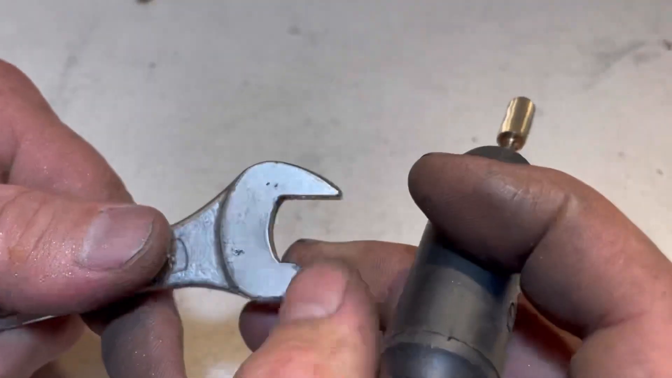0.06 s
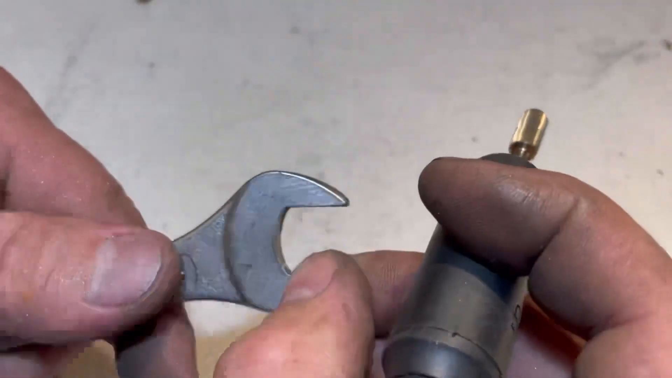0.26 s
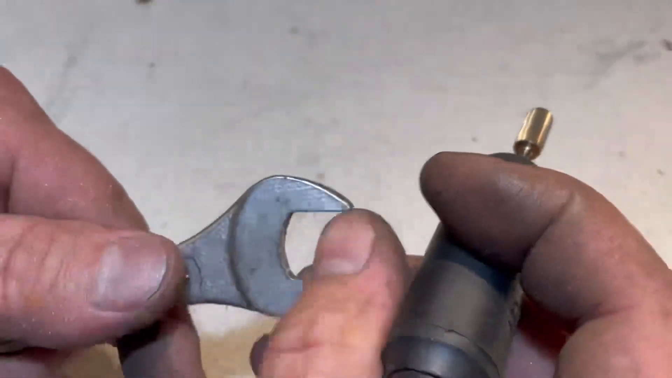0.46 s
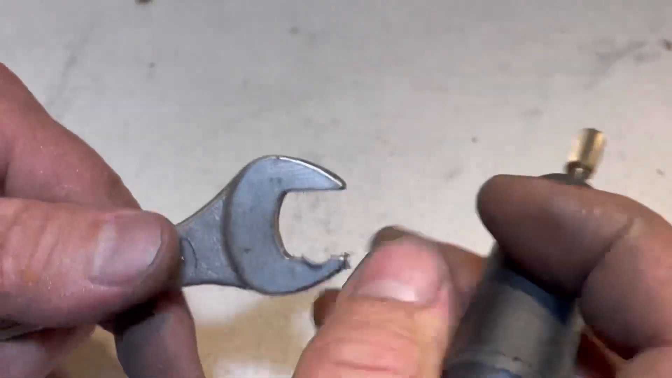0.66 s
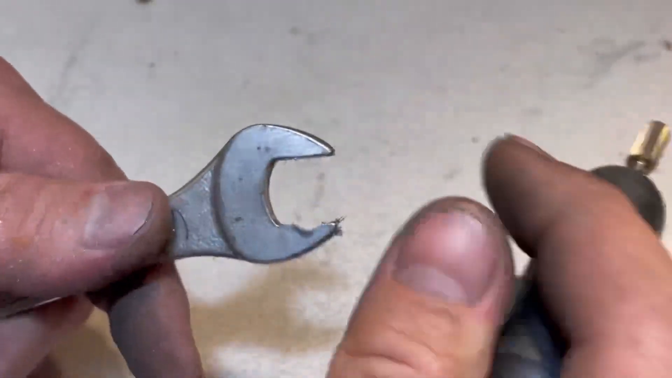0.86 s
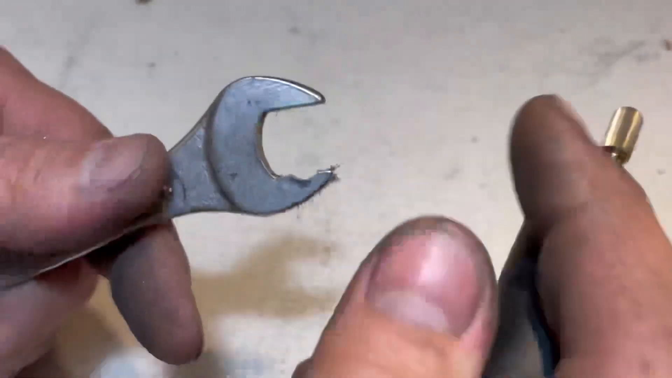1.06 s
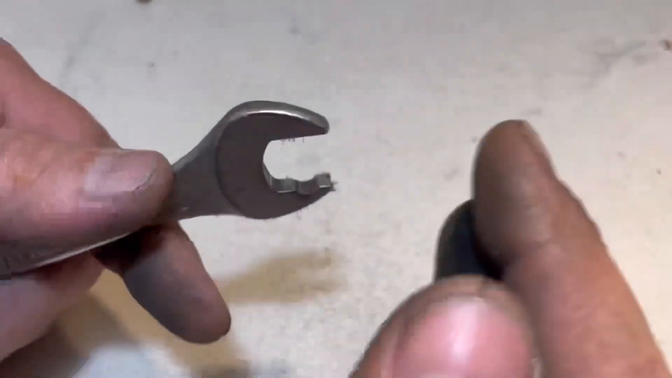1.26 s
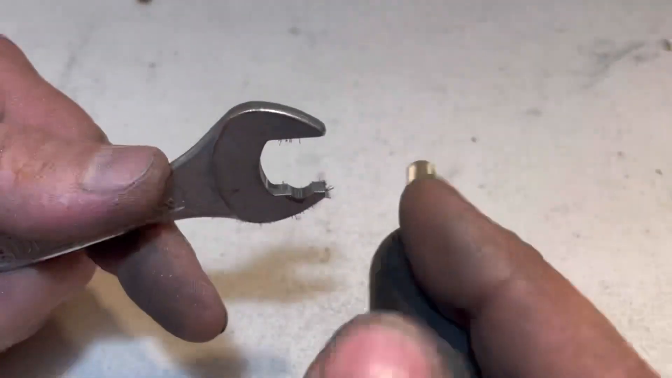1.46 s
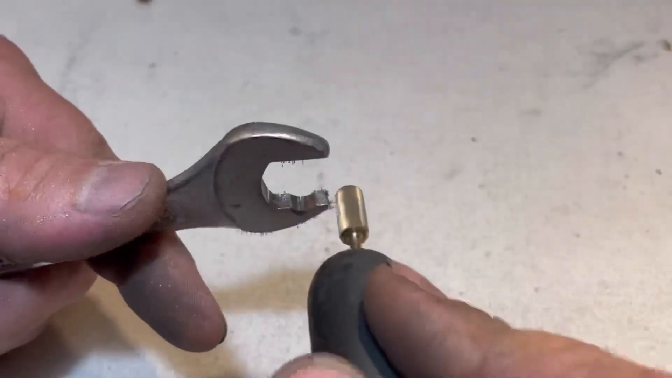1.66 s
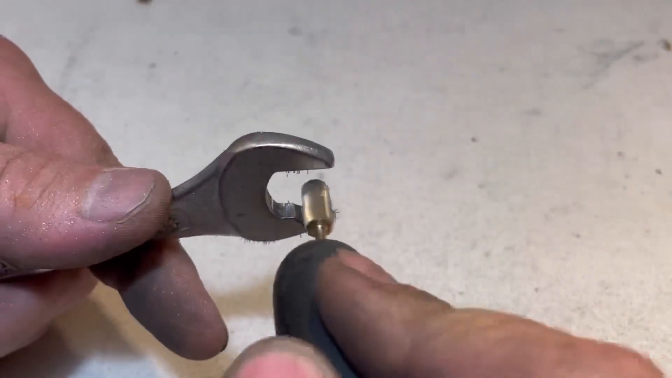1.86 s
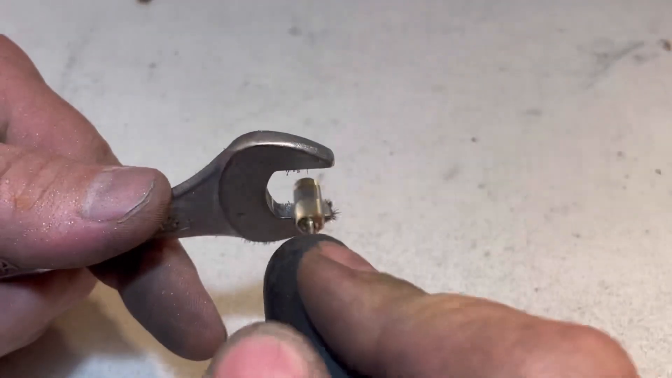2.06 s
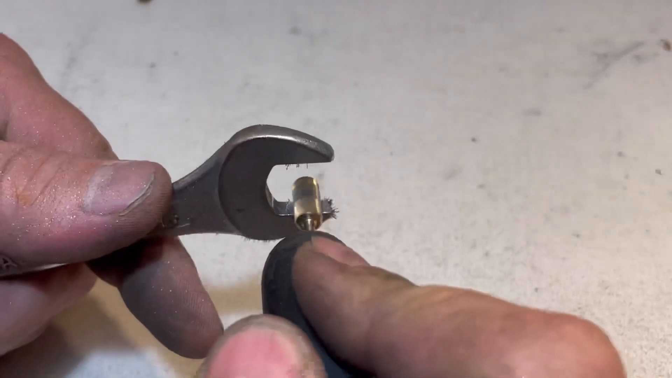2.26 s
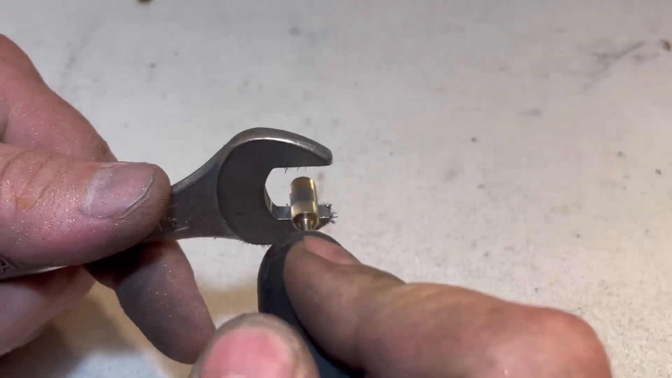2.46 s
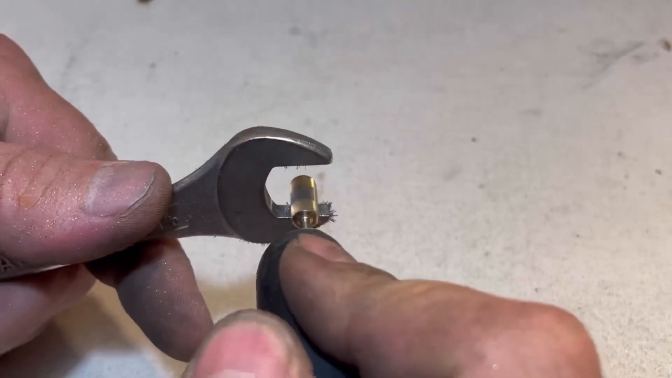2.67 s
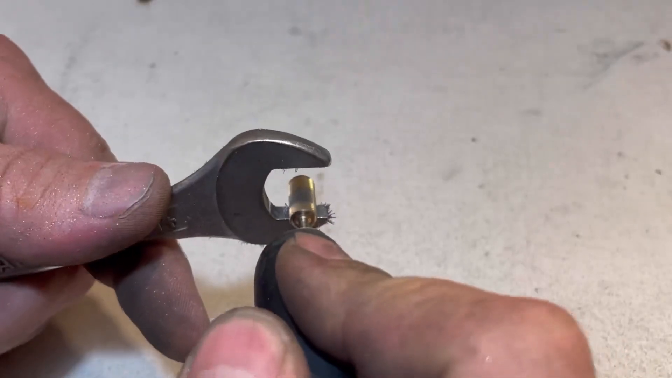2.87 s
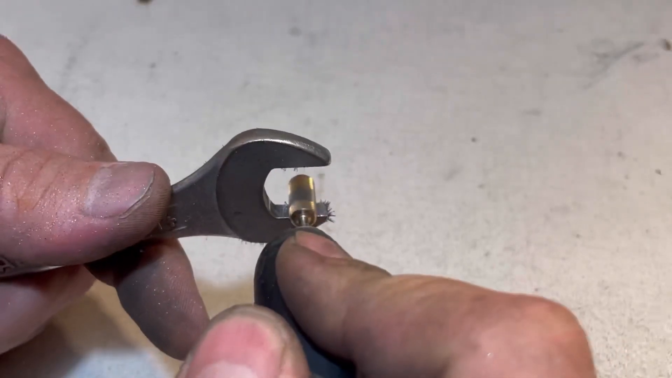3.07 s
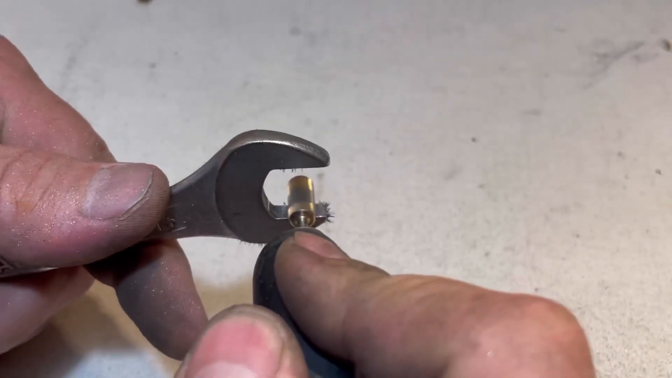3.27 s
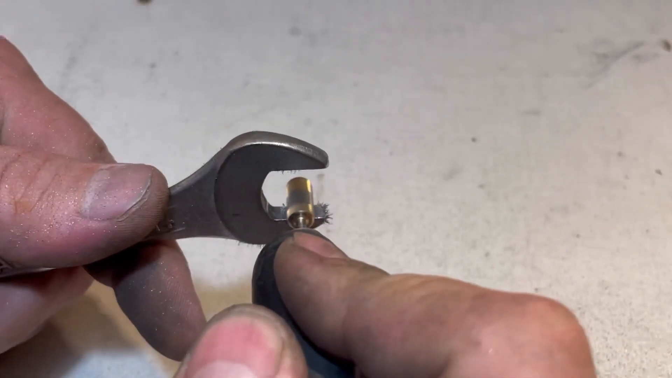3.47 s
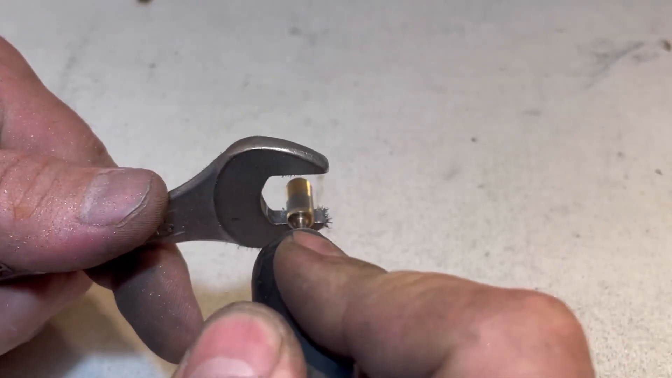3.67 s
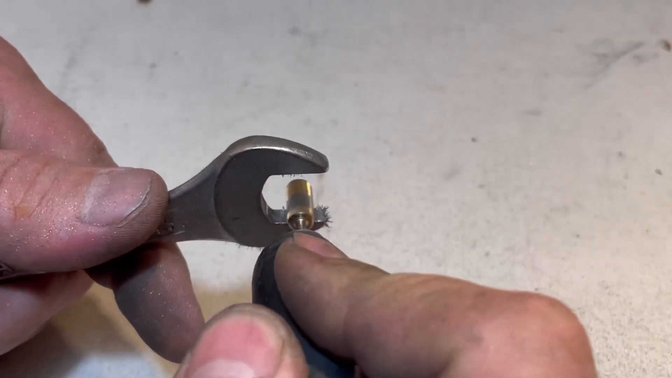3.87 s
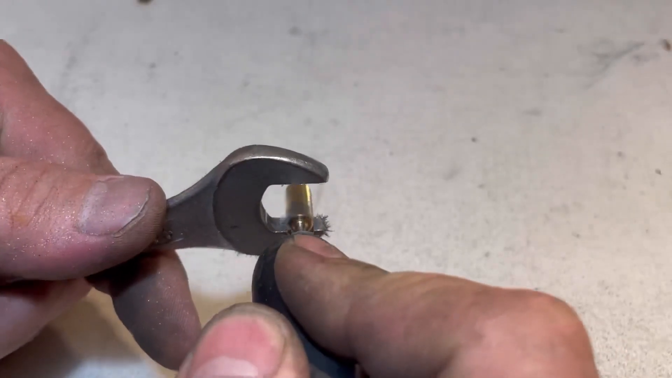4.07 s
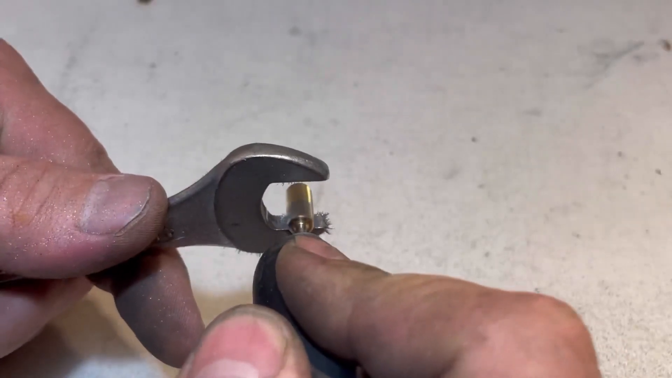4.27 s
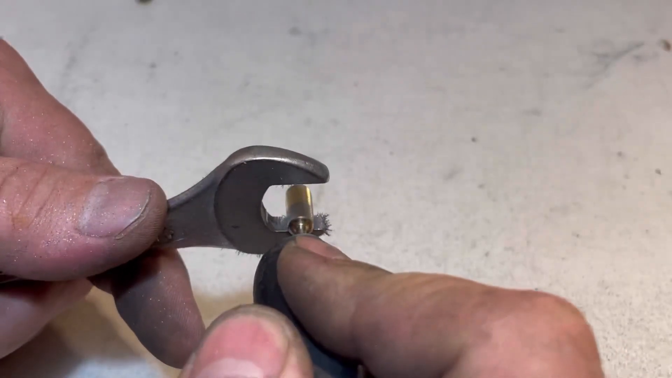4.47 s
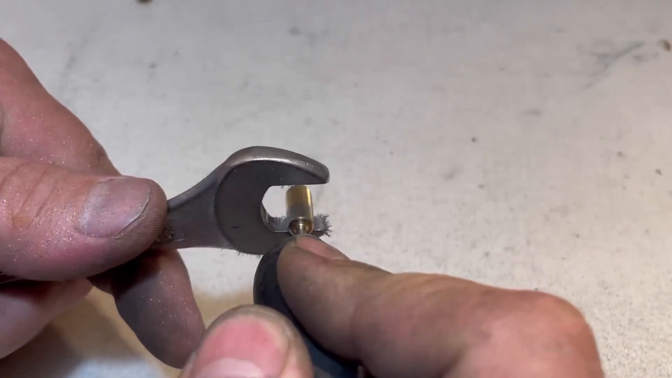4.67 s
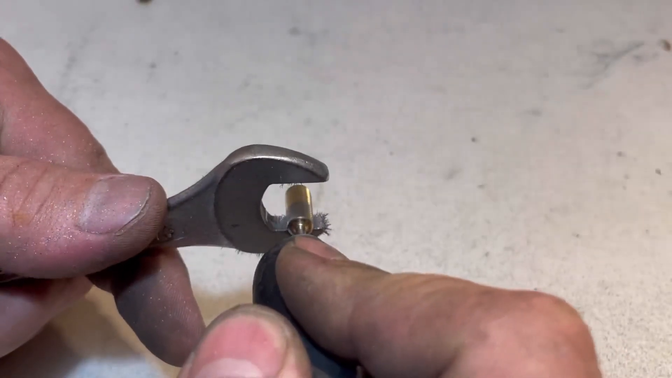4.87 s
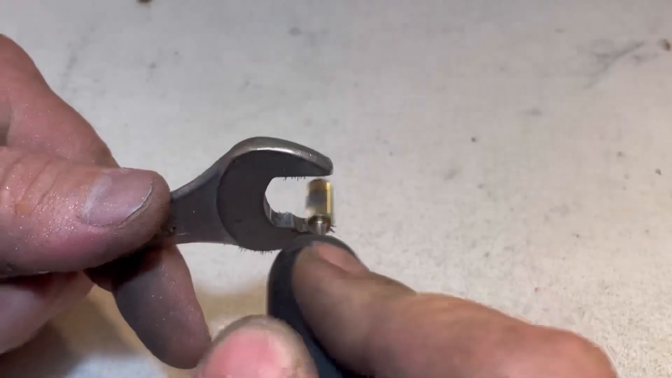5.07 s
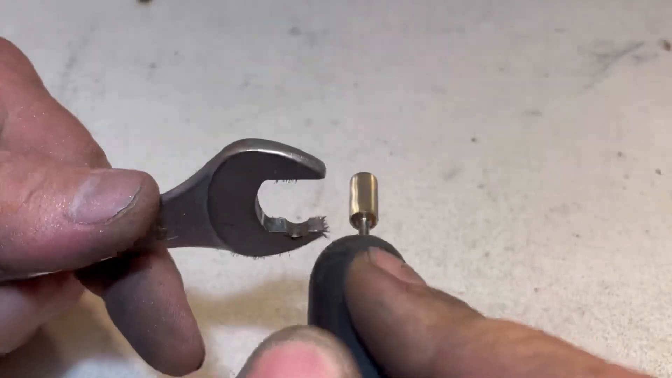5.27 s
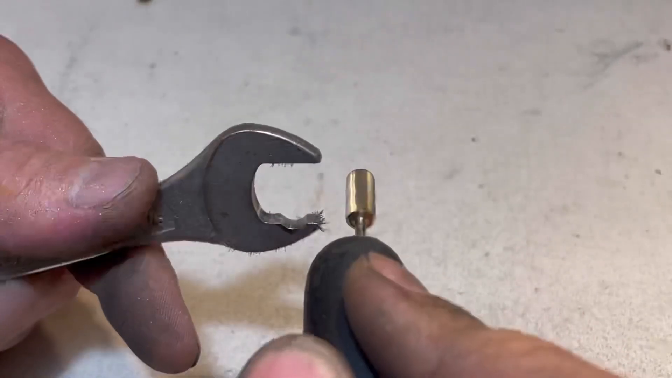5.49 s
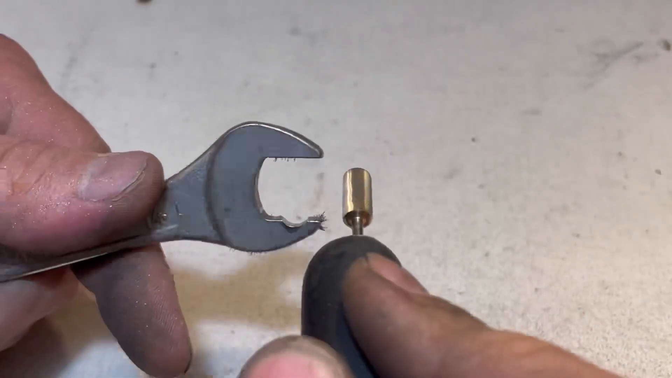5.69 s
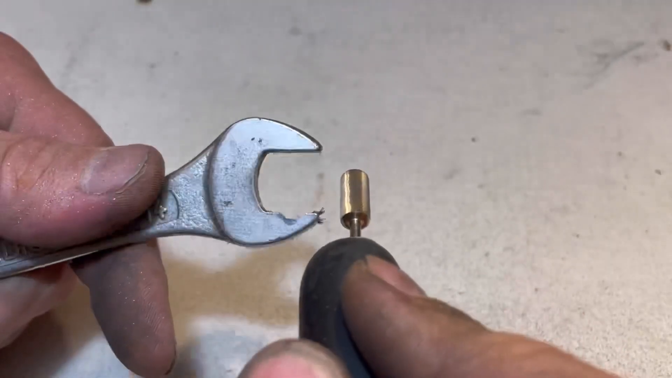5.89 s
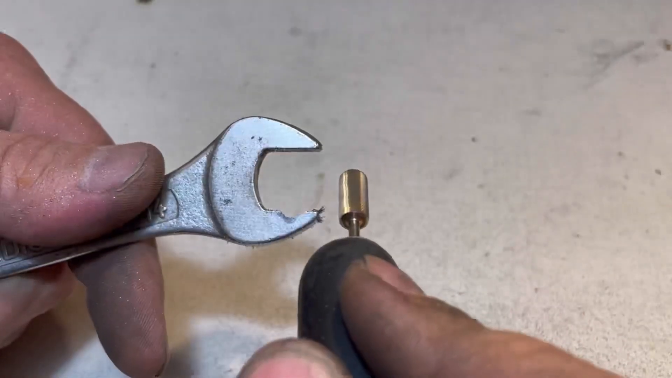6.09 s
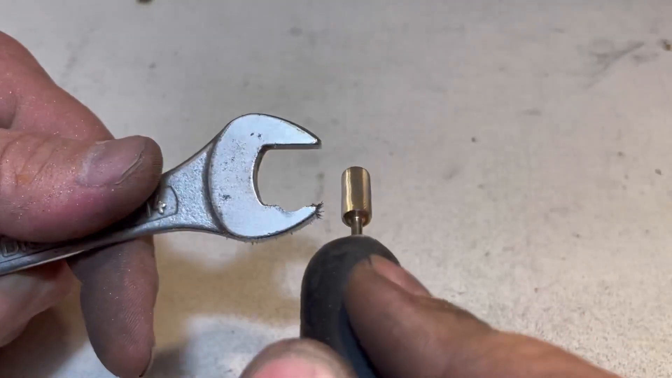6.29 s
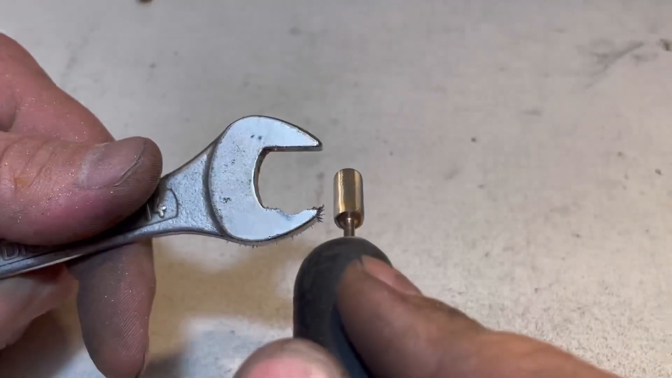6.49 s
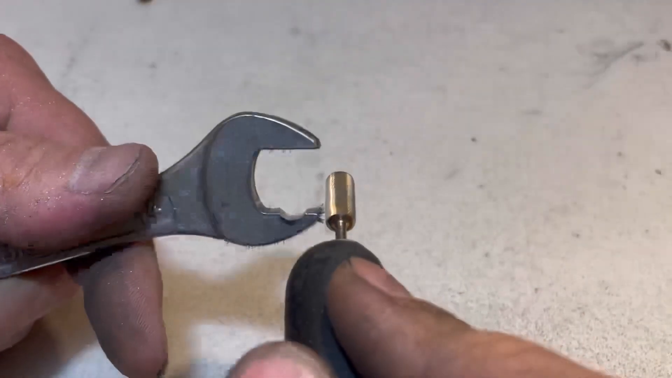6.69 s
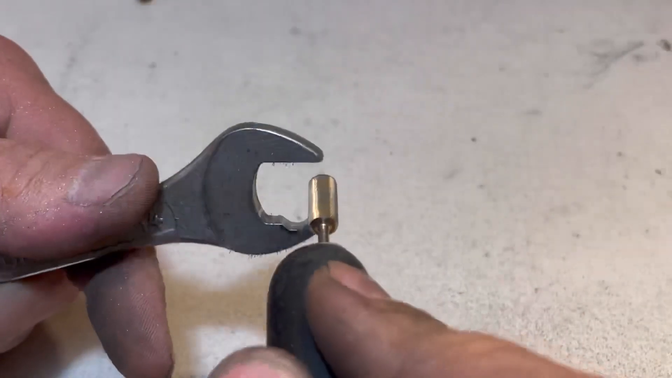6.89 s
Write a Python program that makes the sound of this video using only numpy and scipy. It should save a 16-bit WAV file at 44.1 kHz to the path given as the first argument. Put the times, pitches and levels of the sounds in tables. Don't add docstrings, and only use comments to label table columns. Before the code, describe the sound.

High motor whir runs free, bites into steel with a harsh, ringing scrape while the pitch sags, then climbs back to a clean whine.

```python
import sys
import numpy as np
from scipy import signal
from scipy.fft import rfft, irfft, next_fast_len
from scipy.io import wavfile

SR = 44100
rng = np.random.default_rng(int(sys.argv[2]) if len(sys.argv) > 2 else 0)


def dump(signal):
    limited = np.clip(np.atleast_2d(signal).T, -1, 1)
    pcm = np.round(limited * 32767).astype(np.int16)
    wavfile.write(sys.argv[1], SR, pcm)


def volts_from_decibels(level):
    exponent = np.asarray(level, float) / 20
    return 10 ** exponent


N = 306054
STEP = 64
CONTROL_S = np.arange(0, N, STEP) / SR
FREE_HZ = 371

# [t/s, level/dB]
PRESSURE = [
    (2.1, -21),
    (2.24, -10),
    (2.5, -4.5),
    (2.85, -0.5),
    (3.3, 0),
    (3.6, -3),
    (4.9, 0.5),
    (5.02, -7.5),
    (5.1, -33),
]
# [t/s, length/s, ring level/dB, shank level/dB]
BIT_ROCKS = [(2.14, 0.064, 15.5, 14), (2.49, 0.12, -2, 2.5), (2.58, 0.065, 1, -2), (3.0, 0.15, -5.5, 2),
             (3.57, 0.044, 1.5, -2.5), (3.67, .06, 2.5, -4), (3.8, 0.15, 5.5, 4.5),
             (3.86, 0.051, -3.5, -9.5), (3.94, .07, 3.5, -0.5), (4.01, 0.057, -3, -1.5),
             (4.08, 0.099, -5, 10), (4.14, 0.048, -9, -1.5), (4.2, .04, 1.5, -1), (4.36, 0.025, -1, -3),
             (4.68, .09, 0.5, 2.5), (4.74, 0.038, -10, -3.5), (4.85, 0.089, 1, -6), (4.91, 0.031, -7, -6),
             (4.965, 0.071, -11, 16), (5.06, 0.028, 12, -1)]


def shaft():
    # [t/s, f/Hz]
    allowed_speed = [(0, 374.4), (1.2, 374.6), (1.5, 369.2), (2.2, 363.4), (2.4, 333.5), (2.65, 302.5),
                     (2.9, 270.8), (3.2, 252.5), (3.5, 243.8), (3.9, 231), (4.4, 223.1), (4.96, 211.7),
                     (4.99, 363.8), (6.94, 366)]
    allowed, = curves(allowed_speed)
    lag_s = 0.45
    keep = np.exp(-1 / (lag_s * SR))
    return allowed[0] + signal.lfilter([1 - keep], [1, -keep], allowed - allowed[0])


def motor(hz, turns):
    # [f/Hz, level/dB per Hz]
    whir_colour = [(300, -40.5), (600, -19), (1100, -6), (1800, -9), (2600, 1), (3200, -3), (4000, -3.5),
                   (7000, -3.5), (9500, 0), (11800, 1.5), (12700, 2), (13400, -10), (15000, -6.5),
                   (15800, -14)]
    hum_db, orders_db, chatter_db, whir_db = motor_levels(hz)
    hum = volts_from_decibels(hum_db + 3.5 + 0.072 * wander(rate_hz=55)) * np.sin(2 * np.pi * turns)

    brushes = puffs(turns, steady=0.49, decay=0.31, uneven_db=-1)
    once_rung = ringing(brushes, [(2590, 650, 0)])
    chatter = evened(ringing(once_rung, [(2590, 660, 0)]))

    whir = coloured(puffs(turns, steady=0.55, decay=0.18, uneven_db=2), whir_colour)
    whir = volts_from_decibels(whir_db + 4.5 + wander(rate_hz=30)) * whir
    return hum + shaft_orders(hz, turns, orders_db) + volts_from_decibels(chatter_db - 4) * chatter + whir


def motor_levels(hz):
    # [t/s, hum level/dB, shaft orders level/dB, brush chatter level/dB, fan whir level/dB]
    grips = [(0, -44.5, -54.5, -59, -40), (.46, -48, -50.5, -46, -36.5), (1.36, -35.5, -51, -40.5, -33),
             (2.22, -33, -51.5, -40, -35.5), (2.62, -33.5, -43, -41, -32), (3.15, -35, -51, -40, -45),
             (3.9, -33.5, -52, -42, -47), (5.04, -34, -56, -42, -40.5), (5.2, -38.5, -57.5, -39, -41),
             (5.55, -36, -53, -38.5, -38), (6.7, -37.5, -52, -38.5, -37)]
    # [t/s, length/s, level/dB]
    swings = [(.33, .2, 1), (.6, .12, 1), (.71, .08, -1.5), (.84, 0.15, 2.5), (.95, 0.044, -1),
              (1.1, 0.26, 2), (1.55, .12, 1.5), (1.67, 0.088, 1), (2.48, 0.08, 1.5), (3.28, 0.047, -2.5),
              (3.41, 0.2, 4), (3.79, 0.054, 2.5), (5.6, 0.12, 1)]
    starts, *levels = np.transpose(grips)
    grip = smooth(sum(held(s, N, fade_s=0.1) for s in starts[1:]))
    hum_db, orders_db, chatter_db, whir_db = [np.interp(grip, np.arange(len(starts)), c) for c in levels]
    swing_db = bumps(swings)[0]
    octaves = np.log2(hz / FREE_HZ)
    hum_db = hum_db + swing_db + 28 * octaves
    whir_db = whir_db + 0.76 * swing_db + 7.5 * octaves
    return hum_db, orders_db + 0.62 * swing_db, chatter_db + swing_db, whir_db


def shaft_orders(hz, turns, orders_db):
    # [f/Hz, level/dB]
    housing = [(400, -7.5), (950, -2.5), (1250, 2.5), (1550, -1), (2100, 1.5), (2650, 2.5), (3300, 3.5),
               (12000, 5.5)]
    # [f/Hz, level/dB]
    loaded_jaw = [(520, -6), (850, 2.5), (1200, 1.5), (2150, -8.5), (2750, 8), (3600, 4), (5000, -2.5),
                  (6500, -7)]
    # [start t/s, end t/s, level/dB]
    sings = [(0.59, 0.647, 10.5), (0.57, 0.9, 7), (0.94, 1.14, 8.5), (0.78, 2.3, 10), (1.05, 2.13, 8.5),
             (1.51, 2.2, 11), (1.41, 1.72, 8.5), (1.34, 1.88, 14.5), (1.56, 2.4, 11), (1.4, 2.64, 10.5),
             (.5, .85, 8), (2.75, 3.2, 5.5), (2.3, 3.3, 5), (3.3, 3.9, 6.5), (3.85, 4.4, 10),
             (0.47, 0.63, 8), (5.35, 5.9, 8), (5.45, 5.85, 10.5), (5.15, 5.75, 10.5), (5.85, 7, 10.5),
             (4.9, 6.15, 3), (6.4, 8.2, 13.5), (5.18, 6.1, 10), (6.75, 8.3, 16), (0.34, 1.7, 3.5),
             (5.9, 6.5, 3.5), (1.27, 1.85, 7), (5.5, 6.3, 5.5), (2.45, 2.95, 8.5), (5.15, 6.1, 6)]
    sing_orders = [9, 4, 5, 3, 2, 6, 8, 17, 14, 32, 32, 4, 3, 5, 2, 6, 4, 8, 9, 7, 32, 32, 16, 16, 7, 6, 5,
                   3, 2, 5]
    slow_hz = hz[::STEP]
    loaded = held(2.76, N, fade_s=0.2) * held(-1, 5.0, fade_s=0.046)
    dig_db = 0.55 * bumps(BIT_ROCKS)[1, ::STEP]
    out = np.zeros(N)
    for k in [*range(2, 19), 20, 24, 28, 32]:
        level_db = orders_db[::STEP] + read(housing, k * slow_hz)
        level_db = level_db + loaded * (read(loaded_jaw, k * slow_hz) + (k > 8) * dig_db)
        if k > 10:
            level_db = level_db - 4 * (1 - loaded)
        for order, (start, end, db) in zip(sing_orders, sings):
            if order == k:
                level_db = level_db + db * held(start, end, fade_s=0.061)
        waver_db = 1.94 * slow_wander(rate_hz=16)
        slip = rng.random() + 0.012 * k * slow_wander(rate_hz=60)
        out += smooth(volts_from_decibels(level_db + waver_db)) * np.sin(2 * np.pi * (k * turns + smooth(slip)))
    return out


def grinding(hz, turns):
    # [f/Hz, level/dB per Hz]
    scrape_colour = [(250, -26), (600, -28), (1000, -14), (2100, -19), (2700, -10), (3500, -3.5),
                     (5500, -8.5), (8000, -9), (9500, 7), (11000, -1), (12500, -4.5), (13500, -15),
                     (15000, -11), (16000, -19.5)]
    # [f/Hz, width/Hz, level/dB]
    body_modes = [(7020, 330, 1.5), (8060, 143, -22), (15193, 500, -31)]
    # [f/Hz, width/Hz, level/dB]
    jaw_modes = [(10300, 104, 8.5), (9620, 670, -5.5)]
    scrape_db, ring_db, shank_db, shank_hz, bend_db = cut_levels(hz)
    t = np.arange(N) / SR
    landing = np.clip((t - PRESSURE[0][0]) / 0.1, 0, 1)
    lifting = np.clip((PRESSURE[-1][0] - t) / 0.03, 0, 1)
    touching = landing * lifting

    def bites():
        uneven = volts_from_decibels(0.93 * wander(rate_hz=70))
        return touching * uneven * puffs(turns, steady=0.86, decay=0.23, uneven_db=1)

    edge, shank_bites, jaw_bites = bites(), bites(), bites()
    scrape = coloured(edge + volts_from_decibels(10.5) * ringing(edge, body_modes), scrape_colour)
    scrape = volts_from_decibels(scrape_db + 8) * scrape
    ring = volts_from_decibels(ring_db + 1) * coloured(ringing(edge, jaw_modes), [(1500, -40), (6000, -2)])

    knock = touching * evened(np.exp(-(turns % 1) / 0.04))
    shank = resonate(shank_bites + 0.8 * knock, shank_hz, width_hz=640)
    shank = coloured(shank, [(2150, -8), (2450, -2)])
    shank = volts_from_decibels(shank_db - 4 + 2.3 * wander(rate_hz=35)) * shank

    bend = resonate(jaw_bites, np.full(N, 4300.0), width_hz=1250)
    bend = volts_from_decibels(bend_db - 1.5 + 1.74 * wander(rate_hz=35)) * bend
    first_touch = smooth(held(2.22, 2.55, fade_s=0.03))
    touch = volts_from_decibels(-37.5) * first_touch * resonate(shank_bites, np.full(N, 4220.0), width_hz=75)
    return (scrape + ring + shank + bend + touch) * np.sqrt(touching.mean())


def cut_levels(hz):
    press_db, = curves(PRESSURE)
    octaves = np.log2(hz / FREE_HZ)
    ring_rock_db, shank_rock_db = bumps(BIT_ROCKS)

    def law(full_db, press_share, db_per_octave):
        return full_db + press_share * press_db + db_per_octave * octaves

    scrape_db = law(-27, 1.26, 11.4) + 0.1 * ring_rock_db + 0.33 * shank_rock_db
    ring_db = law(-24, 1, -0.55) + ring_rock_db
    shank_db = law(-24, 0.69, 18.7) + shank_rock_db
    bend_db = law(-24, 1, 17.7) + 0.082 * ring_rock_db + 0.21 * shank_rock_db
    shank_hz = 2670 - 800 * octaves - 23 * shank_rock_db
    return scrape_db, ring_db, shank_db, shank_hz, bend_db


def catches():
    # [t/s, level/dB]
    strikes = [
        (2.839, -9.5),
        (3.788, -11),
        (4.369, -7),
    ]
    ring_hz, decay_s = 10300, 0.017
    t = np.arange(900) / SR
    tone = np.sin(2 * np.pi * ring_hz * t) + 0.21 * np.sin(2 * np.pi * 1.11 * ring_hz * t)
    ring = np.minimum(t / 0.0014, 1) * volts_from_decibels(-60 * (t / decay_s) ** 2) * tone
    out, tick = np.zeros(N), np.zeros(N)
    for s, db in strikes:
        out[round(s * SR):][:900] = volts_from_decibels(db) * ring
    tick[round(0.398 * SR):][:30] = volts_from_decibels(-16) * np.hanning(30) * rng.standard_normal(30)
    return out + ringing(tick, [(3040, 900, 0), (5500, 2500, -1.8)])


def workshop():
    # [f/Hz, level/dB per Hz]
    rumble_colour = [(15, -52), (25, -34), (59, 6), (146, 2.5), (178, 0), (265, 4), (300, 2.5), (390, -2),
                     (660, -120)]
    # [f/Hz, level/dB per Hz]
    judder_colour = [(100, -11), (250, -10), (500, -5), (1000, 0), (1600, 3.5), (2200, -9), (4000, -44)]
    # [t/s, length/s, rumble level/dB,
    # judder level/dB]
    shifts = [(0, 0.093, 0, 11.5), (.6, 1.2, 2, 17), (1.03, 0.26, 2, 9.5), (1.65, 0.34, 5, -1),
              (2.3, .45, 14, 27.5), (2.55, 0.18, 5, 14.5), (2.72, 0.36, 8, 13.5), (3.9, 2.74, -15.5, 4),
              (5.06, 0.13, 13, 16.5), (5.45, 0.53, -3, 6), (5.8, 0.13, 0, -1)]
    rumble_db, judder_db = bumps(shifts) + [[-63], [-68.5]]
    lumps = volts_from_decibels(2 * wander(rate_hz=150)) * rng.standard_normal(N)
    judder = volts_from_decibels(judder_db) * coloured(lumps, judder_colour)
    return volts_from_decibels(rumble_db - 1.5) * coloured(rng.standard_normal(N), rumble_colour) + judder


def ports(x):
    # [f/Hz, phase/rad]
    lead = [(200, .2), (500, .5), (1100, .7), (1600, 0), (2400, 0), (3000, .3), (5300, .3), (5750, -1.3),
            (6700, -.7), (7300, -1.6), (7700, -2.5), (8300, -2.9), (8750, -3.14), (9300, -3.42),
            (10200, -4.1), (11600, -5.1), (12700, -6.28)]
    # [f/Hz, level/dB]
    tilt = [(300, 0), (700, 3.5), (1100, 6), (1700, .5), (2800, 1), (5000, .3), (9000, 0)]
    # [f/Hz, share/1]
    apart = [(60, 0.049), (250, 0.011), (400, 0.0063), (600, 0.33), (1200, 0.4), (1800, 0.03), (2400, 0.12),
             (5200, 0.18), (5800, 0.22), (7400, 0.45), (8000, 0.027), (9300, 0.027), (10000, 0.18),
             (12300, 0.58), (12800, 0.0027)]
    z = signal.stft(x, nperseg=1024)[2]
    start_phase = 2 * np.pi * rng.random((len(z), 1))
    drift = np.cumsum(0.693 * rng.standard_normal(z.shape), axis=1) + start_phase
    echo = signal.istft(z * np.exp(1j * drift), nperseg=1024)[1][:N]
    echo = evened(echo) * np.std(x)

    def echo_share(hz):
        return np.clip(read(apart, hz), 0, 1) / 2

    def left_gain(hz):
        return volts_from_decibels(read(tilt, hz) / 2) * np.exp(0.5j * read(lead, hz))

    direct = shaped(x, lambda hz: np.sqrt(1 - echo_share(hz)))
    scattered = shaped(echo, lambda hz: np.sqrt(echo_share(hz)))
    left = shaped(direct + scattered, left_gain)
    right = shaped(direct - scattered, lambda hz: 1 / left_gain(hz))
    return np.array([left, right])


def puffs(turns, steady, decay, uneven_db):
    strength = volts_from_decibels(uneven_db * rng.standard_normal(4000))[turns.astype(int)]
    burst = strength * np.exp(-(turns % 1) / decay)
    return evened((steady + burst) * rng.standard_normal(N))


def resonate(x, hz, width_hz):
    turn = np.exp(2j * np.pi * np.cumsum(hz) / SR)
    r = np.exp(-np.pi * width_hz / SR)
    return evened((turn * signal.lfilter([1], [1, -2 * r, r * r], x / turn + 1e-18)).real)


def ringing(x, modes):
    return shaped(x, lambda hz: sum(volts_from_decibels(db) / (1 + 2j * (hz - f) / w) for f, w, db in modes))


def coloured(x, points):
    return evened(shaped(x, lambda hz: volts_from_decibels(read(points, hz))))


def shaped(x, gain):
    size = next_fast_len(N)
    return irfft(rfft(x, size) * gain(np.fft.rfftfreq(size, 1 / SR)), size)[:N]


def evened(x):
    return x / np.sqrt(np.mean(x ** 2) + 1e-20)


def read(points, hz):
    f, value = np.transpose(points)
    return np.interp(np.log(hz + 1), np.log(f + 1), value)


def curves(rows):
    s, *columns = np.transpose(rows)
    return [np.interp(np.arange(N) / SR, s, c) for c in columns]


def bumps(rows):
    swells = 0
    for s, length, *heights in rows:
        swells = swells + np.outer(heights, np.exp(-(2 * (CONTROL_S - s) / length) ** 4))
    return np.array([smooth(c) for c in swells])


def held(start, end, fade_s):
    return np.clip(np.minimum(CONTROL_S - start, end - CONTROL_S) / fade_s + 0.5, 0, 1)


def slow_wander(rate_hz):
    rates = rate_hz * np.geomspace(0.04, 1, 16)
    return evened(sum(np.sin(2 * np.pi * (f * CONTROL_S + rng.random())) / np.sqrt(f) for f in rates))


def wander(rate_hz):
    return smooth(slow_wander(rate_hz))


def smooth(control):
    return np.interp(np.arange(N), np.arange(0, N, STEP), control)


def scene():
    hz = shaft()
    turns = np.cumsum(hz) / SR
    return ports(motor(hz, turns) + grinding(hz, turns) + catches() + workshop())


def low_pass(x):
    return signal.sosfilt(signal.butter(12, 16640, fs=SR, output="sos"), x)


def record(dry):
    cut = signal.sosfilt(signal.butter(2, 55, "high", fs=SR, output="sos"), dry)
    lowpass = signal.firwin(401, 15750, window=("kaiser", 9), fs=SR)
    limited = signal.oaconvolve(cut, lowpass[None], "same")
    return low_pass(limited)


dry = scene()
out = record(dry)
dump(out)
```